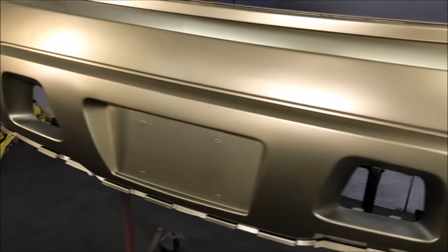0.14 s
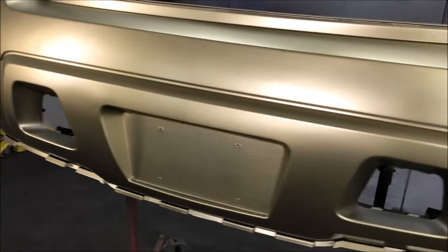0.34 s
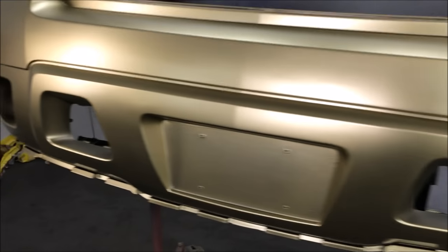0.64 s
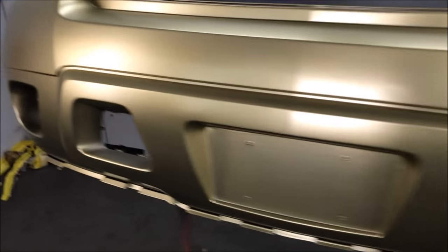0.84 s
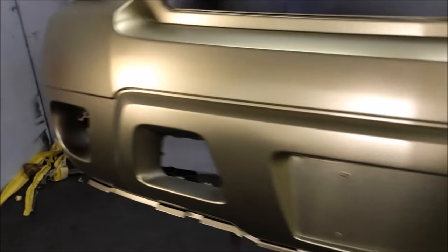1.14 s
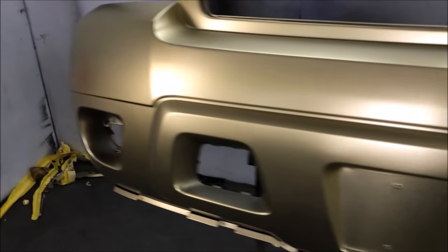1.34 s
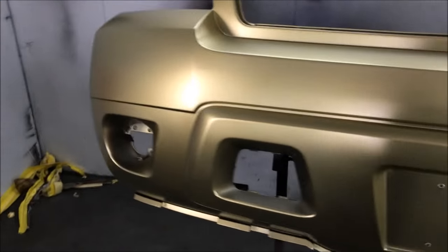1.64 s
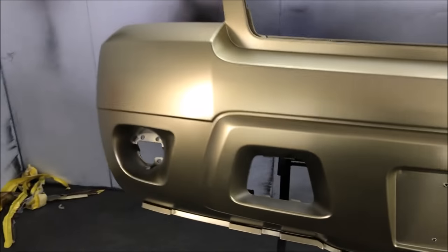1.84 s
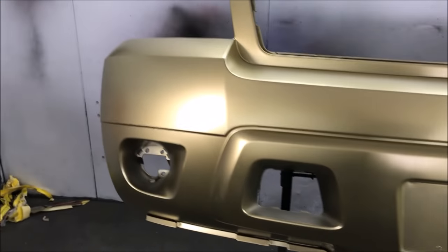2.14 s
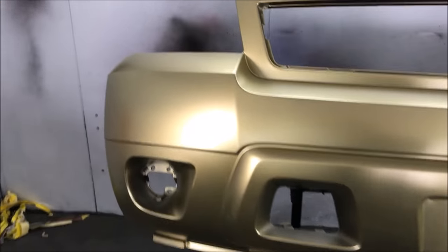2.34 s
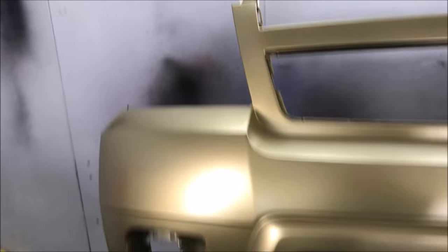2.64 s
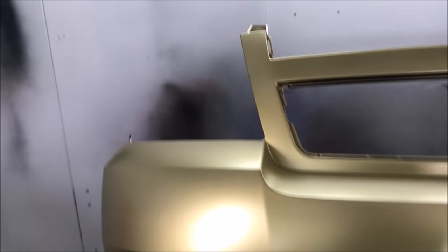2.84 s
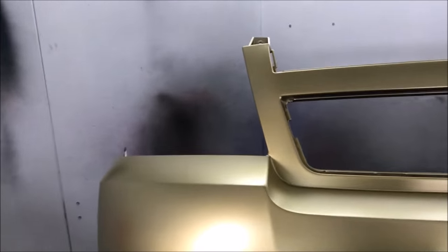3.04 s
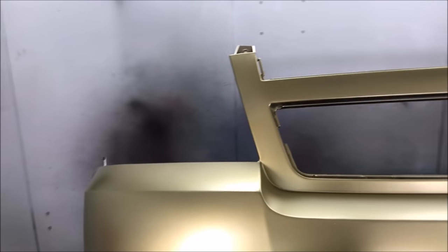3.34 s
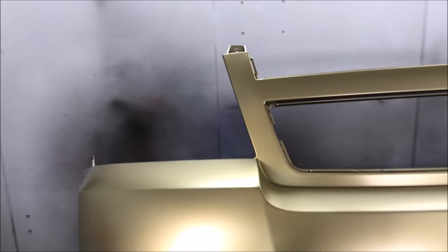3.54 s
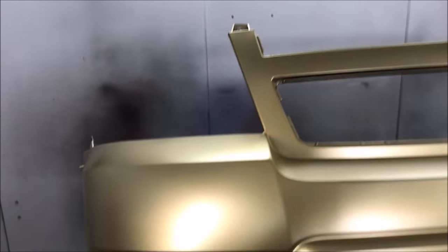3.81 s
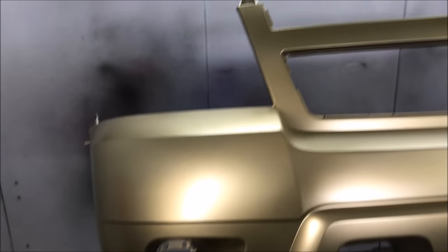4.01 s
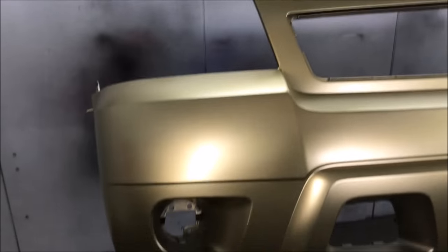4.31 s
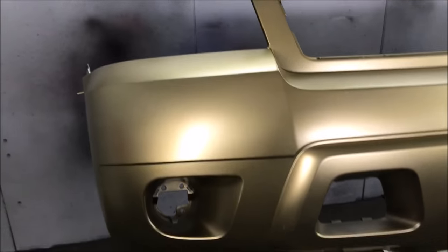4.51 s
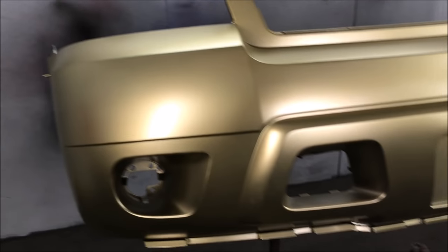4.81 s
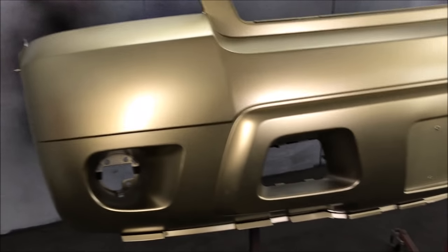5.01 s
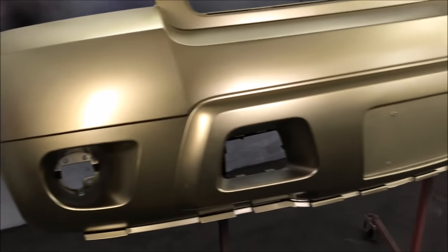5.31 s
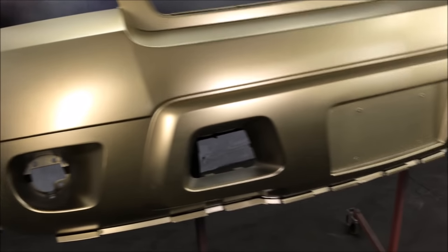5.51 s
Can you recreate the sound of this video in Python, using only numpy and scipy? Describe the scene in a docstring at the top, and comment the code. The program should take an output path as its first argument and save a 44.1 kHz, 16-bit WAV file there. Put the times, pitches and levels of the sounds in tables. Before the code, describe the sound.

Continuous deep ventilation fan hum with unsteady low rumble, soft duct rush and faint hiss, wavering in strength inside a paint booth.

```python
"""The six-bladed extractor fan of a paint booth runs steadily while the microphone is carried through the booth.
From the start, blade tones fade at nodes and swell at antinodes of the standing waves; turbulence rumbles
in bands that swell and dip, the duct rushes with brief surges, filters hiss, and a faint bearing rasp repeats
every turn. All the air noise eases around 1 s; the bass throb of shaft against motor rises slightly to 0.4 s,
sinks until 1.3 s, then grows to 4.3 s. Along the path the strong blade tones weaken overall and the rasp grows."""
import sys
import numpy as np
from scipy import signal
from scipy.fft import rfft, irfft
from scipy.io import wavfile

SR = 44100
rng = np.random.default_rng(int(sys.argv[2]) if len(sys.argv) > 2 else 0)


def store_pcm(level_fs):
    """Save levels as 16-bit WAV."""
    pcm = np.round(np.clip(level_fs, -1, 1) * 32767).astype(np.int16)
    wavfile.write(sys.argv[1], SR, np.atleast_2d(pcm).T)


N = 249606
TIME_S = np.arange(N) / SR

SHAFT_HZ, MOTOR_HZ, BLADES = 24.783, 54.17, 6
WHINE_HZ, WHINE_DB = 2751, -70
LULL_AT_S, LULL_HALF_WIDTH_S, LULL_DB = 1.0, 0.56, 2
SURGE_HALF_WIDTH_S = 0.068
CUTOFF_HZ = 15750

# strong blade tones away from nodes: [multiple of blade rate, level at start/dB rms, fall/dB per s]
STRONG_TONES = [(1, -20, 2.0), (2, -12.8, 1.16), (3, -28.4, 0.1)]
# microphone crosses a tone's node: [multiple of blade rate, t/s, depth/dB, half width/s]
TONE_NODES = [(1, 0.35, 15.5, 0.75), (1, 1.07, 16, 0.34), (1, 1.86, 6, 0.07), (1, 4.45, 7.5, 0.26),
              (2, 0.00, 9, 0.17), (2, 1.30, 3.6, 0.24), (2, 1.75, 1.2, 0.15), (2, 2.04, 2.5, 0.05),
              (2, 2.35, 12.5, 0.36), (2, 3.76, 3.8, 0.11), (2, 4.82, 1.8, 0.14), (2, 5.22, 2.5, 0.08),
              (2, 5.65, 4.5, 0.2), (3, 0.33, 7, 0.11), (3, 0.8, 16, 0.29), (3, 1.89, 15, 0.09),
              (3, 2.33, 5.5, 0.13), (3, 3.1, 5, 0.09), (3, 3.6, 18, 0.28), (3, 5.42, 15, 0.13)]
# weak upper blade tones between swells: [multiple of blade rate, level/dB rms]
UPPER_TONES = [(4, -48.5), (5, -49.5), (6, -54), (7, -53.5), (9, -60), (10, -60), (11, -57.5), (13, -66.5),
               (15, -66)]
# microphone crosses an upper tone's antinode: [multiple of blade rate, t/s, rise/dB, half width/s]
TONE_ANTINODES = [(4, 0.1, 8, 0.4), (4, 2.12, 9, 0.25), (4, 4.68, 11, 0.22), (4, 5.55, 7, 0.25),
                  (5, 1.8, 8, 0.25), (5, 2.7, 7.5, 0.38), (5, 5.12, 8, 0.28), (6, 2.55, 13, 0.36),
                  (6, 3.68, 13, 0.27), (6, 4.88, 9, 0.25), (7, 3.3, 8, 0.42), (11, 4.9, 9, 0.45)]
# bass throb along the path: [t/s, level change/dB]
THROB_PATH = [(0, 1), (0.4, 2), (1.3, -4), (2.2, -2), (3.0, 0), (4.3, 2.5), (5.66, 1.5)]
# bearing rasp spectrum: [f/Hz, relative level/dB per Hz]
RASP_SPECTRUM = [(600, -10), (1500, 0), (2000, 1), (2700, 3.5), (3200, -4), (4000, -7), (6000, -10),
                 (9000, -25)]
# rumble bands, and noise around the third blade tone, before swells, trim and lull:
# [f/Hz, width/Hz, level/dB rms]
RUMBLE_BANDS = [(53.6, 5.1, -44), (77, 13, -36.5), (106.8, 14, -25.5), (124.3, 12.8, -28),
                (140.3, 11, -34.5), (176.5, 12, -30), (200, 14.3, -31.3), (247.1, 20, -29.5),
                (272.3, 33, -33), (323, 37, -32), (354.3, 23, -33.5), (405, 24, -44), (430, 30, -43),
                (468, 26, -43.5), (635, 24, -43), (678, 20, -44), (724, 20, -45.5)]
# rumble band swells or dips: [approximate band f/Hz, t/s, level change/dB, half width/s]
BAND_SWELLS = [(78, 0.65, 5, 0.8), (78, 2.78, 4, 0.16), (78, 3.35, -8, 0.33), (78, 5.6, 4, 0.4),
               (107, 1.08, -3.5, 0.15), (107, 1.55, 5, 0.35), (107, 2.7, -3, 0.4), (107, 3.52, 3, 0.17),
               (107, 4.44, -3, 0.25), (107, 5.7, 6, 0.27), (125, 0.55, 4.5, 0.35), (125, 0.97, -5, 0.13),
               (125, 2.3, 4, 0.3), (125, 4.9, -1.5, 0.87), (142, 0.1, -3, 0.44), (142, 2.7, 5, 0.9),
               (142, 4.6, -3, 0.4), (176, 0.4, 5.5, 0.35), (176, 1.7, -3, 1.3), (176, 3.48, 5.5, 0.15),
               (176, 4.6, 2, 0.42), (176, 5.42, 5.5, 0.2), (202, 0, 5, 0.2), (202, 2.1, 5.5, 0.75),
               (202, 4.5, -5.5, 0.7), (202, 5.66, 5, 0.2), (247, 0.6, 3, 0.3), (247, 2.15, -7, 0.15),
               (247, 2.7, 3.5, 0.2), (247, 5.32, 6, 0.14), (323, 0.4, 3, 0.3), (323, 5.5, -4, 0.2),
               (354, 0.91, -7, 0.4), (354, 1.45, 6, 0.18), (354, 2.6, 2, 0.7), (405, 0.85, -8, 0.35),
               (405, 4.6, 6, 0.7), (430, 0.05, 5, 0.25), (430, 0.8, -6, 0.35), (430, 1.8, -4, 0.25),
               (430, 3.55, -5, 0.3), (430, 4.3, 4, 0.35), (468, 0.7, -5, 0.4), (468, 3.55, -4, 0.3),
               (468, 4.5, 3, 0.35), (468, 5.3, -5, 0.25)]
# broad duct rush spectrum: [f/Hz, relative level/dB per Hz]
RUSH_SPECTRUM = [(20, -17), (38, -10), (60, -4), (110, -3.5), (300, 0), (410, -1.5), (520, -5.3),
                 (610, -7.3), (700, -7.6), (850, -8.1), (1000, -10), (1400, -13.5), (1600, -17.5),
                 (1850, -22.6), (2700, -30.2), (5000, -43)]
# duct turbulence surges, before lull: [t/s, centre f/Hz, width/Hz, peak level/dB rms]
DUCT_SURGES = [(0.12, 660, 160, -34.5), (2.13, 690, 200, -33), (3.09, 1080, 300, -37),
               (3.46, 1100, 300, -37.5), (3.77, 725, 50, -33), (3.9, 660, 110, -33),
               (5.61, 690, 120, -35.5)]
# filter hiss spectrum: [f/Hz, relative level/dB per Hz]
HISS_SPECTRUM = [(1000, -5.5), (2500, 0.5), (4300, 0.5), (4850, -3.5), (5400, 0), (6800, 0.2), (7700, -3),
                 (8600, 0), (9600, -0.5), (10400, -6), (11200, 0), (13000, -2), (15800, -4.5)]


def blade_hum(flutter_db, flutter_width_hz, fading_db):
    """Blades pass the housing six times a turn, giving harmonics of the blade rate."""
    blade_hz = BLADES * SHAFT_HZ
    hum = np.zeros(N)
    for multiple, start_db, fall_db_per_s in STRONG_TONES:
        k = round(multiple)
        path_db = start_db - fall_db_per_s * TIME_S - node_loss_db(k)
        # uneven inflow makes each strong tone flutter
        flutter = flutter_db * narrow_noise(0, flutter_width_hz)
        hum += tone(k * blade_hz, path_db + flutter, wander_rad=0.27)
    for multiple, level_db in UPPER_TONES:
        k = round(multiple)
        fading = fading_db * narrow_noise(0, 2.6)
        hum += tone(k * blade_hz, level_db + antinode_rise_db(k) + fading, wander_rad=0.68)
    return hum


def node_loss_db(k):
    """Pressure cancels near a standing-wave node: loss of blade tone k along the path."""
    return sum(depth_db * bell(at_s, half_width_s)
               for multiple, at_s, depth_db, half_width_s in TONE_NODES if round(multiple) == k)


def antinode_rise_db(k):
    """Pressure adds near a standing-wave antinode: rise of upper tone k along the path."""
    return sum(rise_db * bell(at_s, half_width_s)
               for multiple, at_s, rise_db, half_width_s in TONE_ANTINODES if round(multiple) == k)


def drive_throb(shaft_db, motor_db):
    """Twice the shaft rate lies close to the motor's rate, so the two beat."""
    path_db = np.interp(TIME_S, *np.transpose(THROB_PATH))
    shaft = tone(2 * SHAFT_HZ, shaft_db + path_db)
    motor = tone(MOTOR_HZ, motor_db + path_db)
    return shaft + motor


def bearing_rasp(start_db, rise_db_per_s):
    """A rough track rolled over once a turn repeats its noise, with a thin steady whine."""
    turn_samples = round(SR / SHAFT_HZ)
    # three repeating textures in drifting shares of constant total power
    shares = np.array([narrow_noise(0, 1) for _ in range(3)])
    shares = shares / np.sqrt(np.sum(shares ** 2, axis=0))
    rasp = np.zeros(N)
    for share in shares:
        turn = coloured_noise(RASP_SPECTRUM, size=turn_samples)
        rasp += share * np.resize(turn, N)
    whine = tone(WHINE_HZ, WHINE_DB, wander_rad=1)
    return from_db(start_db + rise_db_per_s * TIME_S) * rasp + whine


def airflow(rumble_trim_db, rush_db, hiss_db):
    """Turbulence rumbles in the booth, rushes in the duct and hisses in the filters; all ease once."""
    rumble = from_db(rumble_trim_db) * booth_rumble()
    rush = from_db(rush_db) * coloured_noise(RUSH_SPECTRUM) + duct_surges()
    hiss = from_db(hiss_db) * coloured_noise(HISS_SPECTRUM)
    lull_gain = from_db(-LULL_DB * bell(LULL_AT_S, LULL_HALF_WIDTH_S))
    return lull_gain * (rumble + rush + hiss)


def booth_rumble():
    """Turbulence as bands of noise, most of them swelling and dipping at times of their own."""
    band_hz = np.array([band[0] for band in RUMBLE_BANDS])
    swells_db = np.zeros((len(RUMBLE_BANDS), N))
    for hz, at_s, change_db, half_width_s in BAND_SWELLS:
        nearest = np.argmin(np.abs(band_hz - hz))
        swells_db[nearest] += change_db * bell(at_s, half_width_s)
    rumble = np.zeros(N)
    for (hz, width_hz, level_db), swell_db in zip(RUMBLE_BANDS, swells_db):
        rumble += from_db(level_db + swell_db) * narrow_noise(hz, width_hz)
    return rumble


def duct_surges():
    """Duct turbulence surges in short whooshes of band-limited noise."""
    return sum(from_db(peak_db) * bell(at_s, SURGE_HALF_WIDTH_S) * narrow_noise(hz, width_hz)
               for at_s, hz, width_hz, peak_db in DUCT_SURGES)


def tone(hz, level_db, wander_rad=0):
    """A sine at an rms level; its phase wanders slowly (rad rms) as the path to it changes."""
    phase_rad = 2 * np.pi * (hz * TIME_S + rng.random())
    phase_rad = phase_rad + wander_rad * narrow_noise(0, 0.89)
    return np.sqrt(2) * from_db(level_db) * np.sin(phase_rad)


def narrow_noise(hz, width_hz):
    """Noise through a steep-sided resonance, a slow drift at 0 Hz; rms 1."""
    detune = (np.fft.rfftfreq(N, 1 / SR) - hz) / (width_hz / 2)
    spectrum = rfft(rng.standard_normal(N)) / np.sqrt(1 + detune ** 4)
    return rms_one(irfft(spectrum, N))


def coloured_noise(spectrum, size=N):
    """White noise shaped to a spectrum interpolated over log frequency; rms 1."""
    hz, db = np.transpose(spectrum)
    bins_hz = np.maximum(np.fft.rfftfreq(size, 1 / SR), 1)
    gain = from_db(np.interp(np.log(bins_hz), np.log(hz), db))
    return rms_one(irfft(rfft(rng.standard_normal(size)) * gain, size))


def bell(at_s, half_width_s):
    """Gaussian from 0 to 1 and back; half width to 1/e."""
    return np.exp(-((TIME_S - at_s) / half_width_s) ** 2)


def rms_one(x):
    """Scale to unit rms."""
    return x / np.sqrt(np.mean(x ** 2) + 1e-20)


def from_db(db):
    """Decibels to amplitude gain."""
    return 10 ** (np.asarray(db) / 20)


def scene():
    """Fan, drive and air together, in mono."""
    hum = blade_hum(flutter_db=1.15, flutter_width_hz=19, fading_db=2.2)
    throb = drive_throb(shaft_db=-41.0, motor_db=-40.5)
    rasp = bearing_rasp(start_db=-52.3, rise_db_per_s=0.6)
    air = airflow(rumble_trim_db=-0.5, rush_db=-26.5, hiss_db=-41.5)
    return (hum + throb + rasp + air)[None, :]


def record(dry):
    """Steep elliptic low-pass: 0.1 dB ripple, 80 dB stopband."""
    low_pass = signal.ellip(12, 0.1, 80, CUTOFF_HZ, fs=SR, output="sos")
    return signal.sosfilt(low_pass, dry)


dry = scene()
out = record(dry)
store_pcm(out)
```